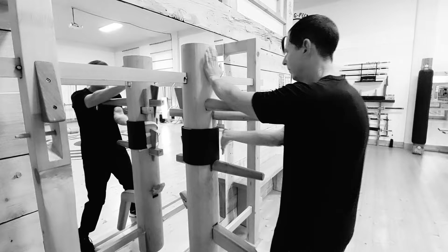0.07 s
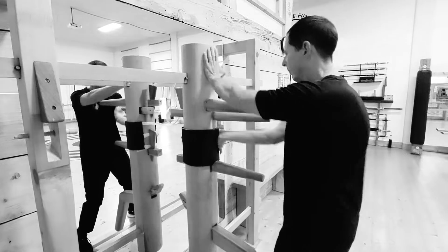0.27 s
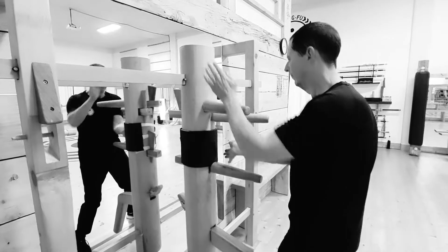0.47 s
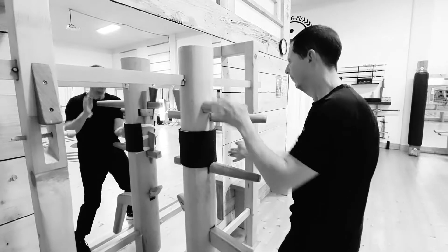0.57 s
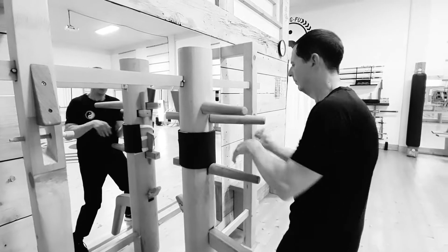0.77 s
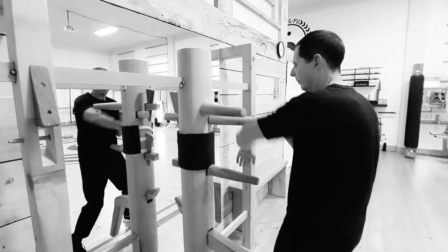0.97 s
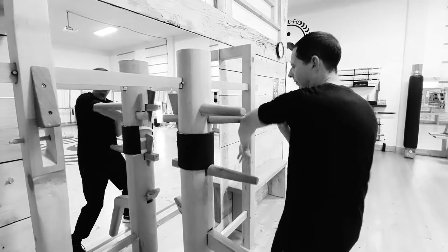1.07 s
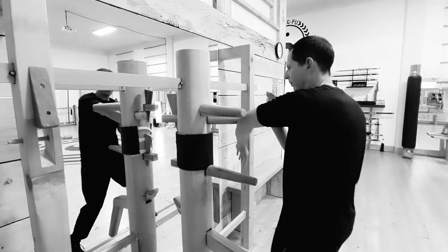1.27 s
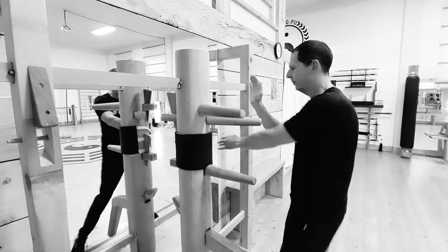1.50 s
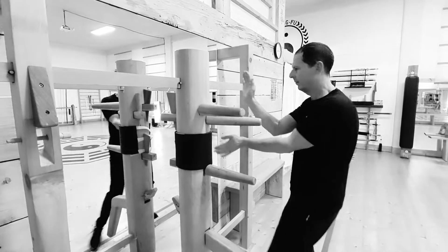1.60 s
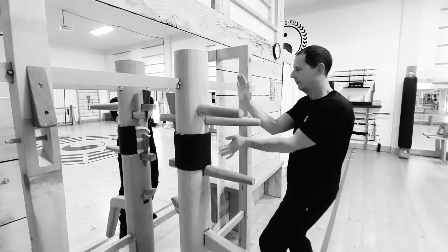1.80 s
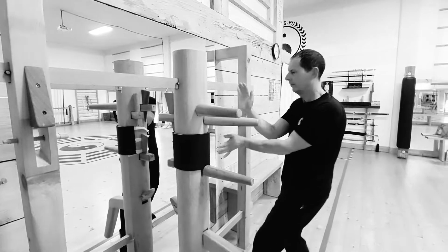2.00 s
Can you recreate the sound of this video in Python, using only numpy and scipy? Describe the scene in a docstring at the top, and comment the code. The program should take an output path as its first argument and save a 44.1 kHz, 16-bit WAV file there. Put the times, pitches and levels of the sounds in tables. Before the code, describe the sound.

Sharp wooden knocks, skin slaps and low thuds come in a fast run as arms strike a training dummy near the microphone. Then a single hard hit on a more distant dummy echoes around the gym hall.

```python
"""A wooden training dummy in a reverberant gym. First, room air and the dying echo of earlier blows.
From 0.2 s, a close flurry of forearms and palms: loose arms clack in their sockets, skin slaps wood,
the trunk thuds on its rails, the frame booms low. At 1.13 s one hard blow on a second dummy, farther
off, rings through the hall over a second boom. At 1.55 s a sleeve brushes faintly as the arms lift."""
import sys
import numpy as np
from scipy import signal
from scipy.fft import rfft, irfft
from scipy.io import wavfile

SR = 44100
rng = np.random.default_rng(int(sys.argv[2]) if len(sys.argv) > 2 else 0)


def wav_out(sig):
    """Save sig, one row per channel (or a flat mono array), as 16-bit PCM at SR to the path in sys.argv[1]."""
    wavfile.write(sys.argv[1], SR, np.round(np.clip(np.atleast_2d(sig).T, -1, 1) * 32767).astype(np.int16))


N = 90404
FFT_SIZE = 4096
GRID_HZ = np.fft.rfftfreq(FFT_SIZE, 1 / SR)
SCENE_S, EVENT_S = np.arange(N) / SR, np.arange(SR // 2) / SR

# room air: f/Hz, density/dB
AIR_SPECTRUM = [(25, 1), (60, 1), (130, 5.5), (400, 5), (1200, -23), (4000, -41), (7000, -24),
                (16000, -35)]
# echo of earlier blows: f/Hz, density/dB
ECHO_SPECTRUM = [(50, -6), (200, -38.5), (700, 15), (1500, 9), (2800, 8), (4600, 0.5), (6500, -29),
                 (16000, -29)]
# hall decay: f/Hz, T60/s
HALL_DECAY = [(60, 1.94), (150, 1.47), (280, 1.03), (600, 1.343), (1000, 1.383), (2400, 1.32), (4500, 1.3),
              (8000, 1.04), (15000, 0.43)]
# hall colour: f/Hz, gain/dB
HALL_GAIN = [(50, -6.5), (150, 1.5), (300, 0.5), (700, 5), (1100, 0), (1750, 2.5), (2700, -1), (4500, 0),
             (8000, 8.5), (15000, 1)]
# stereo field: f/Hz, left-right correlation/1
CORRELATION = [(50, 1), (250, 0.96), (600, 0.96), (1100, 0.21), (2000, 0.018), (16000, 0.19)]
# microphone port imbalance: f/Hz, left minus right/dB
PORT_BALANCE = [(100, 1.5), (600, -2.5), (1100, -1), (1650, -5.5), (2400, -11), (3400, -11), (4800, -6.5),
                (6500, 25.5), (9000, 14), (13000, 14)]
# sleeve brushes: t/s, level/dB, T60/s
SLEEVE_BRUSHES = [(1.545, -72, 1), (1.560, -71, 0.04), (1.583, -64, 0.023)]
# sleeve cloth: f/Hz, density/dB
CLOTH_SPECTRUM = [(1000, -26), (5000, -5), (9000, 11), (14000, 9), (16000, -7)]
# frame and floor booms: t/s, gain/dB
FRAME_BOOMS = [(0.319, -15), (1.11, -18.5)]
# trunk shoved against its rails: t/s, level/dB, f/Hz, hall send/dB
TRUNK_THUDS = [(0.24, -34, 148, 5.5), (0.244, -31.5, 391, 3.5), (.308, -29, 283, 5),
               (.387, -30.5, 150.7, 6), (0.469, -22.5, 298, 0), (0.503, -27.5, 176.3, -2),
               (.575, -31, 146, -8), (0.589, -29, 306, 1.5), (.668, -26, 148, -4), (.672, -29, 307, -5),
               (0.744, -34.5, 174, -1), (1.138, -30, 285.7, 10.5), (1.138, -42, 136, 12.5)]
# skin on wood: t/s, level/dB, T60/s
SKIN_SLAPS = [(0.2445, -34.5, 0.032), (0.3954, -17.5, 0.091), (.4160, -42, 0.1), (.5875, -19, 0.03)]
# skin slap: f/Hz, density/dB
SKIN_SPECTRUM = [(100, 1), (1000, 8), (3000, 10.5), (4800, 9), (6200, -4), (8500, -1.5), (11000, -8),
                 (16000, -11)]
# far dummy, ringing modes: f/Hz, level/dB, T60/s
FAR_MODES = [(280, -22, 0.18), (399.5, -7, 0.52), (605, 0.5, 0.21), (712, -3, 0.083), (1040, -11, 0.11),
             (1324, 7, 0.048), (1474, 4.5, 0.06), (1704, -9, .11), (1857, -8, 0.13), (2275, -19, 0.045),
             (2850, -9, 0.044), (3993, -2, 0.078), (4100, -16, 0.079)]
# far dummy, dense short-lived modes: f/Hz, density/dB
FAR_SPECTRUM = [(100, -17.5), (260, 0.5), (350, -22), (490, -11.5), (610, 3), (850, -1.5), (1400, -3),
                (1850, 0.5), (2080, -5), (2800, -1), (3450, -11.5), (4600, -4), (6000, -20.5),
                (9000, -31.5), (16000, -27)]
# far dummy, touch, blow, crack and rebound:
# t/s, level/dB, centre/Hz, width/oct, rise/s, clack T60/s, ring re clack/dB, hall send/dB
FAR_HITS = [ (1.1302, -25, 2480, 1.7, .001, .04, -15, -17),
            (1.1346, -7.5, 1177, 1.27, 0.0045, 0.043, -8.5, 3.5),
            (1.1359, -10, 3360, 0.74, 0.00056, 0.047, -11.5, -0.5),
            (1.153, -17.5, 1510, 0.33, 0.00083, 0.05, -10, 1), ]
# near dummy, ringing modes: f/Hz, level/dB, T60/s
NEAR_MODES = [(286.3, -5, 0.13), (391.5, -4, 0.19), (628.4, -1.5, 0.19), (709.7, 2.5, 0.046),
              (1070.7, -7, 0.18), (1366, -9.5, 0.061), (1690, -2.5, 0.1), (2230, -22, 0.04),
              (2245, -15.5, 0.17), (2622, -3, 0.046), (3110, -19, 0.18)]
# near dummy, dense short-lived modes: f/Hz, density/dB
NEAR_SPECTRUM = [(60, -19.5), (250, -15.5), (470, -1.5), (650, -1), (900, 1), (1700, -3), (2800, -1.5),
                 (3500, -7.5), (4600, -8.5), (6000, -27), (9000, -33.5), (12000, -33), (16000, -31)]
# near dummy, wood on wood:
# t/s, level/dB, centre/Hz, width/oct, rise/s, clack T60/s, ring re clack/dB, hall send/dB
NEAR_HITS = [ (0.2271, -24.5, 2220, 1.13, 0.00021, 0.17, -4.5, -2),
             (.2850, -19.5, 2040, 0.59, 0.0087, 0.12, 2.5, -2),
             (0.3023, -13, 684, 0.78, 0.0072, 0.12, 6, -6.5),
             (0.349, -20.5, 2600, 2.2, 0.0014, 0.044, 17, 9),
             (.3670, -13, 2230, 0.7, 0.00044, 0.1, -7.5, -2), (0.41, -18, 2850, 0.56, 0.0019, 0.11, 5, -11),
             (0.4561, -8, 2530, 0.62, 0.00021, 0.068, -14.5, -9.5),
             (.4600, -18.5, 767, 1.5, 0.001, 0.058, -14.5, 5.5), (.5190, -30, 600, .5, .003, 0.1, -4, -20),
             (0.533, -18, 2100, 0.76, 0.0037, 0.029, -24, 5),
             (.5440, -9.5, 1940, 0.55, 0.0085, 0.05, 2, -9.5),
             (.5660, -12.5, 1670, 0.07, .003, 0.097, 15, -10),
             (.6260, -19.5, 1830, 2.4, 0.0017, 0.077, -4, -6),
             (0.6592, -17.5, 2630, 0.54, 0.00073, 0.058, 2.5, -5),
             (.7470, -15.5, 1290, 0.8, 0.0051, 0.032, -0.5, -16), ]


def amp(db):
    """Decibels to gain."""
    return 10 ** (np.asarray(db) / 20)


def lookup(table, hz=GRID_HZ):
    """Table value, interpolated over log frequency."""
    table_hz, values = np.transpose(table)
    return np.interp(np.log(hz + 1), np.log(table_hz + 1), values)


def add(mix, start_s, sound):
    """Mix a sound in at start_s."""
    part = mix[:, round(start_s * SR):][:, :sound.shape[-1]]
    part += sound[..., :part.shape[1]]


def colour(x, gain_db):
    """Minimum-phase filter; gain_db on GRID_HZ."""
    log_gain = np.log(amp(np.r_[gain_db, gain_db[-2:0:-1]]))
    response = np.exp(np.conj(signal.hilbert(log_gain)))
    taps = np.fft.ifft(response).real[:FFT_SIZE // 2]
    return signal.fftconvolve(x, np.array(taps, ndmin=x.ndim), axes=-1)[..., :x.shape[-1]]


def stereo_noise(n):
    """White noise, alike in the bass, nearly unrelated in the treble."""
    left, other = rfft(rng.standard_normal((2, n)))
    corr = lookup(CORRELATION, np.fft.rfftfreq(n, 1 / SR))
    right = corr * left + np.sqrt(1 - corr ** 2) * other
    return irfft(np.array([left, right]), n)


def wander(n, step_s):
    """Unit-size random curve, turning every step_s."""
    return np.interp(np.arange(n) / SR / step_s, np.arange(n), rng.standard_normal(n))


def strike(rise_s, t60_s):
    """Envelope: linear rise, free decay."""
    return np.minimum(EVENT_S / rise_s, 1) * amp(-60 * np.maximum(EVENT_S - rise_s, 0) / t60_s)


def with_energy(x, envelope):
    """Scale each channel to the envelope's energy."""
    energy = np.sum(x ** 2, axis=-1, keepdims=True)
    return x * np.sqrt(np.sum(envelope ** 2) / (energy + 1e-20))


def shaped_noise(envelope, spectrum_db):
    """Enveloped, filtered noise with the envelope's energy."""
    return with_energy(colour(stereo_noise(len(envelope)) * envelope, spectrum_db), envelope)


def background(air_db=-65.5, echo_db=-53.5, fall_db_per_s=42):
    """Steady room air; the hall still rings from earlier blows."""
    air = shaped_noise(np.ones(N), lookup(AIR_SPECTRUM))
    echo = shaped_noise(np.ones(N), lookup(ECHO_SPECTRUM))
    return amp(air_db) * air + amp(echo_db - fall_db_per_s * SCENE_S) * echo


def hall(send, delay_s=0.0027, build_s=0.21, start_gain=0.56):
    """Diffuse tail: builds up, then dies at its own rate in each band."""
    hz, t_s, bands = signal.stft(stereo_noise(N), SR, nperseg=512)
    gain_db = lookup(HALL_GAIN, hz)[:, None] - 60 * t_s / lookup(HALL_DECAY, hz)[:, None]
    tail = signal.istft(bands * amp(gain_db), SR, nperseg=512)[1][:, :N]
    tail *= (SCENE_S > delay_s) * np.interp(SCENE_S, [0, build_s], [start_gain, 1])
    return signal.fftconvolve(send, tail / np.sqrt(0.067 * SR), axes=1)[:, :N]


def frame_boom(gain_db, hz=56.6, rise_s=0.38, t60_s=1, waver_depth=0.52, waver_hz=5.5):
    """Lowest resonance of frame and floor: swells after heavy blows, wavers as it dies."""
    waver = 1 + waver_depth * (wander(N, 1 / waver_hz) + 1j * wander(N, 1 / waver_hz))
    tone = (waver * np.exp(2j * np.pi * hz * SCENE_S)).imag
    swell = 1 - np.exp(-(SCENE_S / rise_s) ** 2)
    return amp(gain_db - 60 * SCENE_S / t60_s) * swell * tone


def trunk_thud(level_db, hz, width_oct=0.46):
    """A soft push swings trunk and rails briefly: a tone plus a noise band of equal energy."""
    envelope = strike(rise_s=0.0027, t60_s=0.17)
    tone = np.sqrt(2) * envelope * np.sin(2 * np.pi * hz * EVENT_S)
    band_db = np.maximum(-6 * (np.log2((GRID_HZ + 1) / hz) / width_oct) ** 2, -70)
    return amp(level_db) * (tone + shaped_noise(envelope, band_db))


def soft_contact(spectrum, level_db, t60_s, crackle_db=5):
    """Skin or cloth meets a surface in many tiny snaps."""
    envelope = strike(rise_s=0.0021, t60_s=t60_s)
    crackle = amp(crackle_db * wander(len(EVENT_S), step_s=0.00096))
    snaps = with_energy(envelope * crackle, envelope)
    return amp(level_db) * shaped_noise(snaps, lookup(spectrum))


def excitation_db(hz, centre_hz, width_oct, floor_db=-15):
    """Band one contact excites most: a bell in log frequency over a flat floor."""
    offset_oct = np.log2((hz + 1) / centre_hz)
    return 20 * np.log10(amp(floor_db) + np.exp(-0.5 * (offset_oct / width_oct) ** 2))


def wood_knock(modes, spectrum, level_db, centre_hz, width_oct, rise_s, t60_s, ring_db):
    """Wood on wood: dense modes clack, the dummy's own modes ring on."""
    envelope = strike(rise_s, t60_s)
    clack = shaped_noise(envelope, lookup(spectrum) + excitation_db(GRID_HZ, centre_hz, width_oct))
    ring = 0
    for hz, mode_db, mode_t60_s in modes:
        spread_rad = np.array([[0], [np.arccos(lookup(CORRELATION, hz))]])
        phase_rad = 2 * np.pi * (hz * EVENT_S + rng.random()) + spread_rad
        gain = amp(mode_db + excitation_db(hz, centre_hz, width_oct))
        ring += gain * strike(rise_s, mode_t60_s) * np.sin(phase_rad)
    knock = clack + amp(ring_db) * with_energy(ring, envelope)
    return amp(level_db) * with_energy(knock, envelope)


def scene(soft_send_db=-12):
    """Contacts arrive direct and via the hall, booms direct only; background underneath."""
    events = []
    dummies = (NEAR_HITS, NEAR_MODES, NEAR_SPECTRUM), (FAR_HITS, FAR_MODES, FAR_SPECTRUM)
    for hits, modes, spectrum in dummies:
        for start_s, *contact, send_db in hits:
            events.append((start_s, wood_knock(modes, spectrum, *contact), send_db))
    for start_s, level_db, hz, send_db in TRUNK_THUDS:
        events.append((start_s, trunk_thud(level_db, hz), send_db))
    for contacts, spectrum in (SKIN_SLAPS, SKIN_SPECTRUM), (SLEEVE_BRUSHES, CLOTH_SPECTRUM):
        for start_s, level_db, t60_s in contacts:
            events.append((start_s, soft_contact(spectrum, level_db, t60_s), soft_send_db))
    direct, send = np.zeros((2, 2, N))
    for start_s, sound, send_db in events:
        add(direct, start_s, sound)
        add(send, start_s, amp(send_db) * sound)
    for start_s, gain_db in FRAME_BOOMS:
        add(direct, start_s, frame_boom(gain_db))
    return direct + hall(send) + background()


def record(dry, cutoff_hz=16200):
    """Two microphone ports, each with its own colour; full-scale clip; low-pass."""
    balance_db = lookup(PORT_BALANCE)
    right_db = -10 * np.log10((1 + amp(balance_db) ** 2) / 2)  # mean power gain of 1
    ports = [colour(dry[0], right_db + balance_db), colour(dry[1], right_db)]
    lowpass = signal.firwin(511, cutoff_hz, window=("kaiser", 9), fs=SR)
    return signal.oaconvolve(np.clip(ports, -1, 1), lowpass[None], "same")


dry = scene()
out = record(dry)
wav_out(out)
```